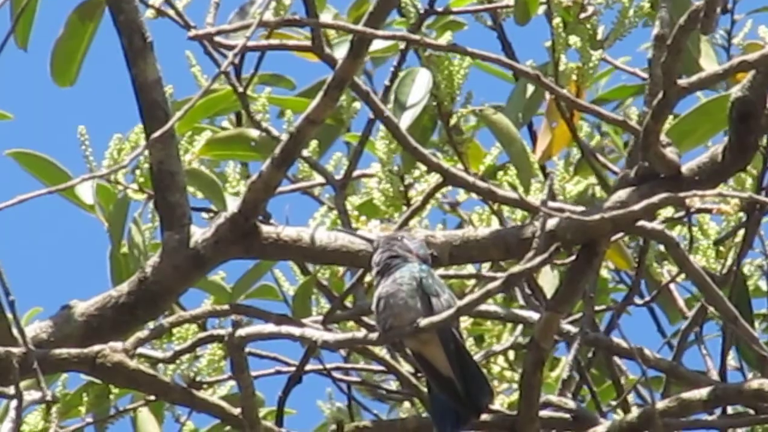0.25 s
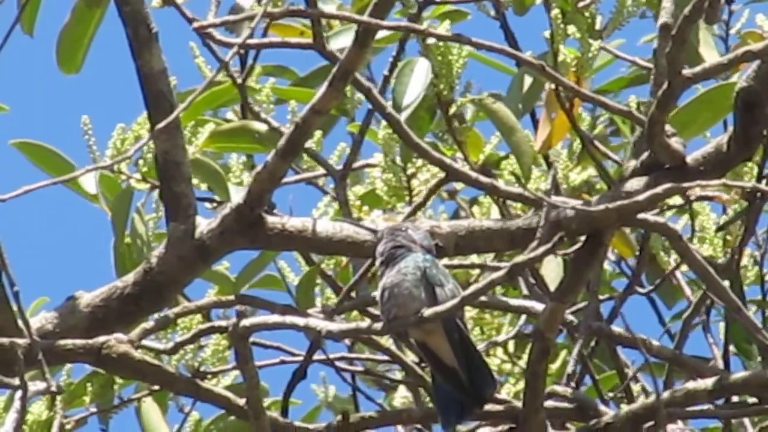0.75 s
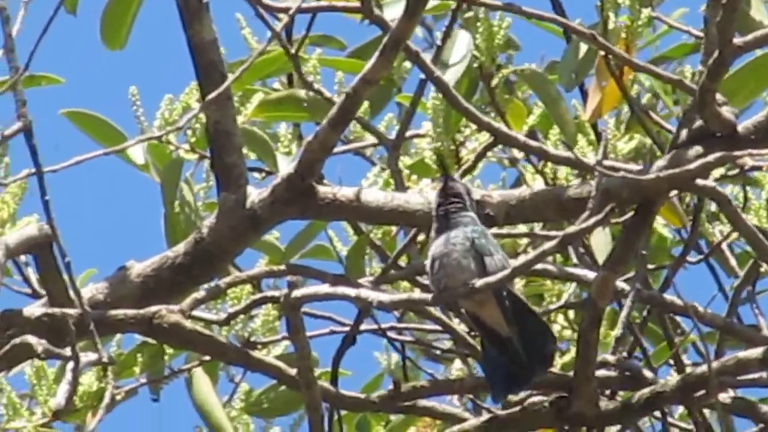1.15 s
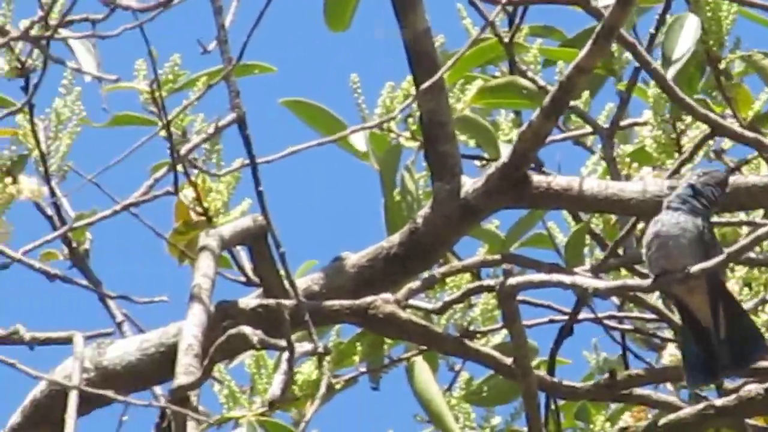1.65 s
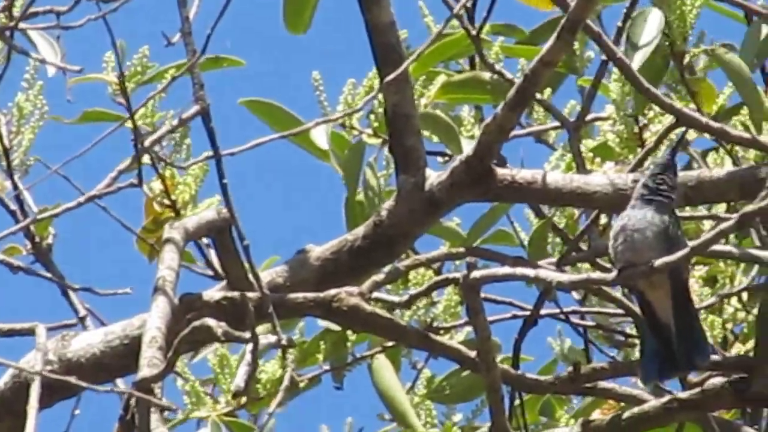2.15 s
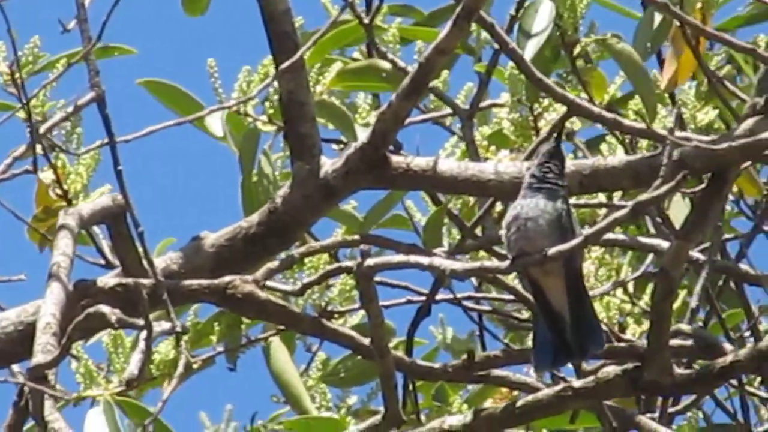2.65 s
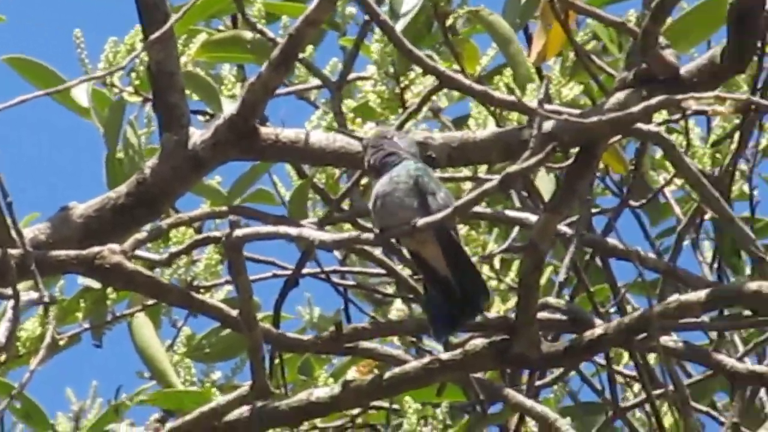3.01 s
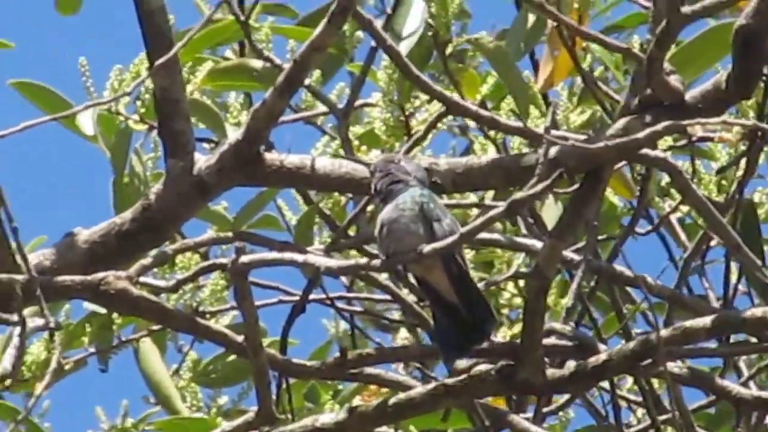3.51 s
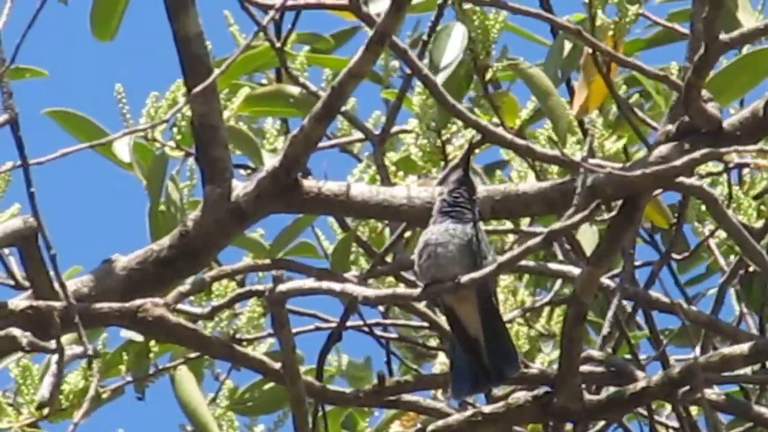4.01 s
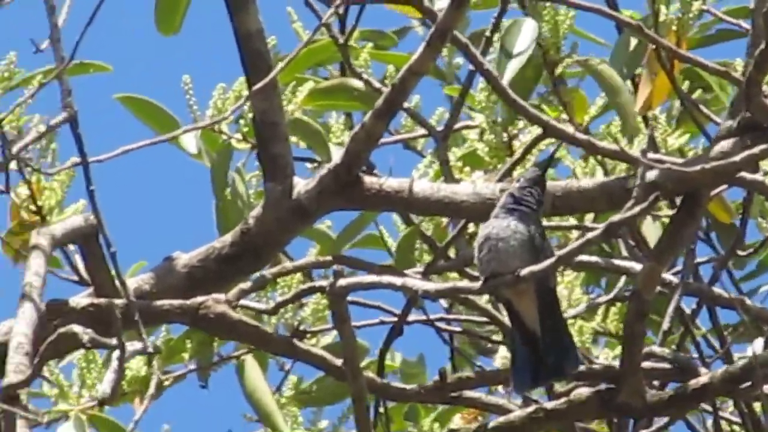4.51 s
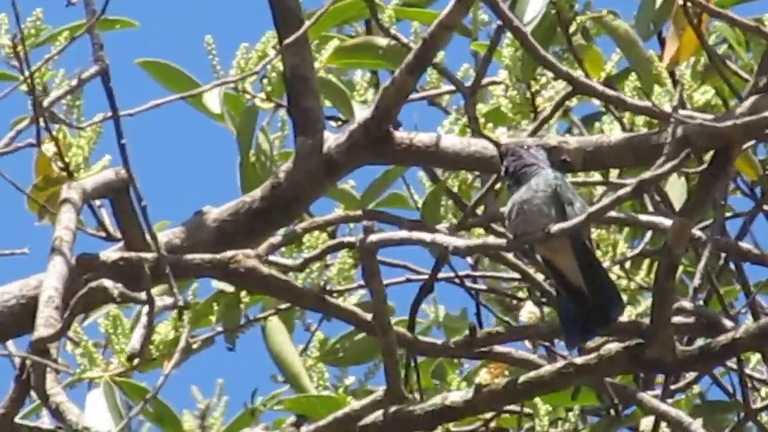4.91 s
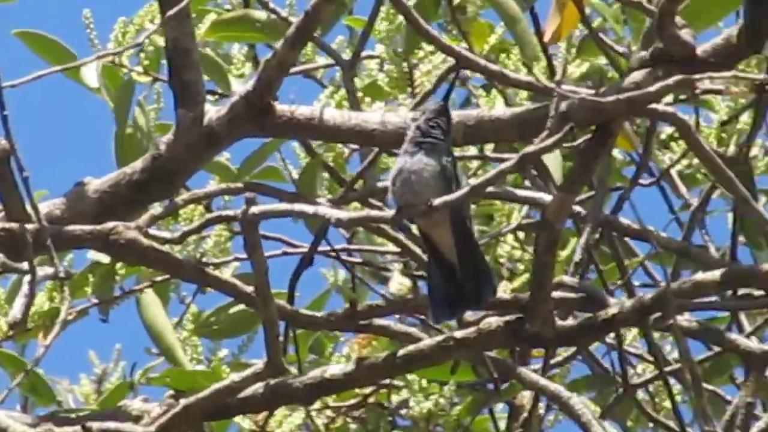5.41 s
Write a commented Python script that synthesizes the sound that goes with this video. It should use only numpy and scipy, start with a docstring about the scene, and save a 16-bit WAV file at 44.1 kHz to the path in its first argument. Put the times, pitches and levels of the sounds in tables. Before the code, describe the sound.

A soft, steady outdoor rush with a very faint low hum runs throughout, about five and a half seconds. At 1.2 seconds a hummingbird in a nearby tree begins a run of ten sharp, very high chips, evenly spaced a little under half a second apart, the last at about 5.1 seconds. Each is a tiny, almost pure whistle with a trace of hiss and a short tail from the leaves. They follow a repeating order: falling, rising, falling, wavering. The wavering ones, at 2.5 and 4.2 seconds, are higher and slightly softer. The chips are by far the loudest sound and sit just left of centre. From about 1.9 to 3.1 seconds a distant songbird gives a very faint thin whistle and six little upward notes. A few soft, dull knocks come around 3.5 to 3.7 seconds and again at 4.4.

```python
"""A hummingbird perched in a tree gives ten sharp chips in a repeating order: fall, rise, fall, wave.
Each is a near-pure, frequency-modulated whistle from the syrinx; falls and rises hop between two
registers. A faint band of hiss around 6 kHz is heard during each chip.
Reflection from limbs and scattering by leaves give each chip a short tail.
Behind it are a faint far songbird, a few soft knocks and a steady outdoor rush."""
import sys
import numpy as np
from scipy import signal
from scipy.fft import rfft, irfft
from scipy.io import wavfile
from scipy.ndimage import uniform_filter1d

SR = 44100
rng = np.random.default_rng(int(sys.argv[2]) if len(sys.argv) > 2 else 0)


def transcribe(u):
    """Save the signal u as a 16-bit wav file named by the first command-line argument.

    u: samples, shape (n,) or (channels, n), limited to [-1, 1]; the rate is SR.
    q: integer samples, one column per channel.
    """
    v = np.clip(np.atleast_2d(u).T, -1, 1)
    q = np.round(v * 32767).astype(np.int16)
    wavfile.write(sys.argv[1], SR, q)


N = 249592

# Settings of each gesture: (first register [0 lower, 1 upper], last register [0 or 1],
# flutter depth in the upper register [Hz], hiss gain [dB], overtone gain [dB])
GESTURES = {"fall": (1, 0, 150, -26.5, 0), "rise": (0, 1, 460, -29, -.7), "wave": (0, 0, 0, -50, 3)}
# The hummingbird's calls: (time [s], gesture [name], time stretch [ratio], pitch [ratio],
# glide depth [ratio], level [dB], register hop after onset [s], left minus right [dB])
CHIPS = [(1.2038, "fall", 1, .99, 1, -11.7, .0185, 1.7),
         (1.6414, "rise", 1.01, 1.002, 1, -11.4, .0303, 1.7),
         (2.0835, "fall", .99, 1.001, 1, -11.0, .0147, 1.5), (2.5112, "wave", 1, 1, 1, -13.4, 0, 1.4),
         (2.9527, "fall", 1.01, 1.008, 1.02, -11.2, .0157, 1.5),
         (3.3733, "rise", .99, .998, 1, -12.7, .028, 1.6),
         (3.8030, "fall", 1, 1.002, 1.02, -10.8, .0152, 2.0), (4.2290, "wave", 1, 1, 1.09, -16.5, 0, .8),
         (4.6915, "fall", .96, 1.004, .95, -11.8, .0118, 2.7),
         (5.1177, "rise", 1, .995, .98, -13.3, .0268, 1.4)]
# The bill beams treble forward, so low notes spill more into the leaves: (frequency [Hz], gain [dB])
LEAF_SPILL = [(3800, 9.5), (5000, 7.5), (6300, 4), (7500, 4), (12000, 6.5)]
# The far songbird's notes: (time [s], duration [s], starting pitch [Hz], upward slur [Hz], level [dB])
FAR_NOTES = [(1.926, 0.14, 3600, 110, -59), (2.292, .031, 4280, 240, -56), (2.407, .035, 4220, 300, -54),
             (2.54, .04, 4100, 180, -57.5), (2.666, .045, 4060, 200, -59.5), (2.80, 0.038, 3970, 190, -59),
             (3.092, .036, 3880, 200, -60)]
# Soft impacts: (time [s], level [dB], thud relative to body [dB], mode tuning [ratio])
KNOCKS = [(3.503, -48.5, -16, 1.03), (3.521, -55, -14, 1.05), (3.615, -55, 1, 0.4), (3.669, -49, 2, 0.81),
          (4.406, -50, -15, 1.3), (4.436, -56, -14, 0.91)]
# Resonances of the knocked body: (frequency before tuning [Hz], bandwidth [Hz], gain [dB])
KNOCK_MODES = [(730, 150, 4), (1050, 120, -17), (2860, 350, -16)]
# Spectral density of the outdoor rush: (frequency [Hz], relative level [dB])
RUSH_SPECTRUM = [(20, -18), (42, -14.5), (55, -8.5), (85, -1.5), (140, -3), (260, -5), (420, -2.5),
                 (560, -2.5), (810, 0), (1250, -3.5), (2000, -7.5), (4000, -13.5), (8000, -21),
                 (15500, -28)]
# Stereo width of the rush: (frequency [Hz], side minus mid [dB])
RUSH_WIDTH = [(50, -12), (130, -4.5), (300, -2), (700, -5), (1500, -3.5), (4000, 2), (12000, -2)]
# Low tones within the rush: (frequency [Hz], rms wander [Hz], level [dB])
HUM_TONES = [(55.7, 3.58, -70.5), (138, 3.48, -72)]

NOTE_HZ, CHIP_S = 6330, .052  # nominal resting note of falls and rises; time allotted to a chip
REGISTER_HOP_HZ, HOP_S = 700, .0003  # interval between registers; time constant of the hop
FLUTTER_RATE_HZ, PITCH_JITTER = 470, .005  # jitter is an rms fraction of the pitch


def hummingbird(right_lag_rad=0.39):
    """Multipath propagation: the bird turns its head, so each direct chip is joined by new echoes."""
    out = np.zeros((2, N))
    for start, gesture, stretch, ratio, depth, db, hop_at_s, pan_db in CHIPS:
        chip = syrinx(gesture, stretch, ratio, depth, hop_at_s)
        left = chip * undb(pan_db / 2)
        right = chip * undb(-pan_db / 2) * np.exp(-1j * right_lag_rad)
        tree = branches() + colour(foliage(), LEAF_SPILL)
        add(out, start, undb(db) * signal.fftconvolve(np.real([left, right]), tree, axes=1))
    return out


def syrinx(gesture, stretch, ratio, depth, hop_at_s, harmonics_db=(-27, -42), upper_db=-3):
    """Source and filter: one gliding whistle with weak harmonics, as a complex signal."""
    first, last, flutter_depth_hz, hiss_db, bright_db = GESTURES[gesture]
    t = np.arange(int(CHIP_S * SR)) / SR
    contour = {"fall": fall, "rise": rise, "wave": wave}[gesture]
    hz, envelope = contour(t / stretch, depth)
    register = first + (last - first) * (1 + np.tanh((t - hop_at_s) / HOP_S)) / 2
    # the upper register is unstable: its pitch flutters fast and unevenly
    flutter = np.sin(phase_of(FLUTTER_RATE_HZ * (1 + .5 * walk(FLUTTER_RATE_HZ, len(t)))))
    pitch = ratio * hz + register * (REGISTER_HOP_HZ + flutter_depth_hz * flutter)
    pitch *= 1 + PITCH_JITTER * walk(2500, len(t))
    phase = phase_of(pitch)
    # a faint band of hiss around 6 kHz is heard during each chip
    band = resonate(rng.standard_normal(len(t)), hz=6030, width_hz=2800)
    hiss = signal.hilbert(resonate(band, hz=6030, width_hz=2800))
    tone = envelope * (np.exp(1j * phase) + undb(hiss_db) * hiss / np.std(hiss))
    # the throat favours the fundamental, so overtones stand out more at the weak low end of a glide
    envelope_db = 20 * np.log10(np.maximum(envelope, 1e-9))
    overtone_db = bright_db + upper_db * register + envelope_db * (1 - 0.81 * (pitch < 6000))
    for k, harmonic_db in enumerate(harmonics_db, 2):
        tone += undb(overtone_db + harmonic_db) * np.exp(1j * k * phase) * (k * pitch < SR / 2)
    return tone * signal.windows.tukey(len(t), .04)


def fall(t, depth, swoop_hz=2600, swoop_s=.0068, drop_at_s=0.022, drop_hz=2560, drop_s=0.022):
    """Downward frequency sweep: the pitch swoops onto the note, rests, then drops as it fades."""
    swoop = swoop_hz * np.exp(-(t / swoop_s) ** 2)
    hz = NOTE_HZ + swoop - depth * drop_hz * ease(t - drop_at_s, drop_s)
    return hz, swell(t, attack_s=0.018, hold_s=0.00074, release_s=0.029)


def rise(t, depth, climb_hz=3620, climb_s=0.032, lift_at_s=0.037, lift_hz=280, lift_s=0.0068):
    """Upward frequency sweep: the pitch climbs ever more slowly to the note, then lifts a little."""
    to_go = 1 - np.sin(np.pi / 2 * np.minimum(t / climb_s, 1))
    hz = NOTE_HZ - depth * climb_hz * to_go + lift_hz * ease(t - lift_at_s, lift_s)
    return hz, swell(t, attack_s=.031, hold_s=.001, release_s=0.014)


def wave(t, depth, top_hz=9250, dip_at_s=0.0078, dip_hz=1050, dip_s=0.0055,
         drop_at_s=.018, drop_hz=2520, drop_s=.0072,
         flick_at_s=0.034, flick_hz=1050, flick_s=0.0102, lead_db=-10):
    """Frequency modulation in two pulses: a soft high dip, then a loud drop that ends in an upflick."""
    dip = dip_hz * np.exp(-((t - dip_at_s) / dip_s) ** 2)
    drop = drop_hz * (1 - 1 / (1 + (np.maximum(t - drop_at_s, 0) / drop_s) ** 2))
    hz = top_hz - depth * (dip + drop) + flick_hz * ease(t - flick_at_s, flick_s)
    lead = undb(lead_db) * swell(t, attack_s=.011, hold_s=.001, release_s=0.015)
    return hz, lead + swell(t - drop_at_s, attack_s=0.012, hold_s=0.0019, release_s=0.012)


def swell(t, attack_s, hold_s, release_s):
    """Amplitude envelope of one push of air."""
    return ease(t, attack_s) - ease(t - attack_s - hold_s, release_s)


def branches(count=12, echoes_db=-12.5):
    """Early reflections: distinct echoes from limbs around the perch follow the direct path."""
    paths = np.zeros(SR // 2)
    delays_s = rng.uniform(.002, .014, count)
    paths[(delays_s * SR).astype(int)] = rng.choice([-1, 1], count) * undb(echoes_db) / np.sqrt(count)
    paths[0] = 1
    return paths


def foliage(leaf_db=-17, leaf_t60=0.14, far_db=-26, far_t60=0.37, build_s=0.0048):
    """Diffuse scattering: leaves return a grainy tail, further trees a fainter and longer one."""
    t = np.arange(SR // 2) / SR
    build_up = 1 - np.exp(-t / build_s)
    leaves = rng.standard_normal((2, len(t))) ** 3 * build_up * np.exp(-np.log(1000) * t / leaf_t60)
    far_trees = rng.standard_normal((2, len(t))) * build_up * np.exp(-np.log(1000) * t / far_t60)
    return (level(leaves, leaf_db) + level(far_trees, far_db)) / np.sqrt(len(t))


def far_bird(scatter_gain_db=13):
    """Reverberation: scattering by leaves blurs a thin whistle and a run of little upslurs."""
    direct = np.zeros((1, N))
    for start, length_s, hz, slur_hz, db in FAR_NOTES:
        progress = np.linspace(0, 1, int(length_s * SR))
        pitch = hz + slur_hz * np.sin(2 * progress)
        add(direct, start, undb(db) * np.sin(np.pi * progress) * np.sin(phase_of(pitch)))
    return direct + undb(scatter_gain_db) * signal.fftconvolve(direct, foliage(), axes=1)[:, :N]


def knocks(attack_s=0.00087, decay_s=0.011, dull_hz=4000):
    """Damped resonance: each brief scuff excites a few broad modes over a low thud."""
    out = np.zeros((2, N))
    t = np.arange(SR // 6) / SR
    envelope = 2 * (1 - np.exp(-t / attack_s)) * np.exp(-t / decay_s)
    for start, db, thud_db, ratio in KNOCKS:
        scuff = rng.standard_normal(len(t)) + .5 * rng.standard_normal((2, len(t)))
        scuff = signal.lfilter(*signal.butter(2, dull_hz, fs=SR), scuff)
        body = sum(undb(mode_db) * resonate(scuff, hz * ratio, width_hz)
                   for hz, width_hz, mode_db in KNOCK_MODES)
        thud = resonate(scuff, hz=150, width_hz=130)
        add(out, start, envelope * (level(body, db) + level(thud, db + thud_db)))
    return out


def outdoors(rush_db=-51.5, flicker_db=-0.08, pan_db=-1.4, hum_pan_db=4):
    """Partial coherence between the ears spreads a distant rush wide around a faint wavering hum."""
    mid = colour(rng.standard_normal(N), RUSH_SPECTRUM)
    side = colour(colour(rng.standard_normal(N), RUSH_SPECTRUM), RUSH_WIDTH)
    left_right = np.array([[1], [-1]])
    rush = (mid + side * left_right) * undb(rush_db) / np.std(mid)
    hum = sum(level(np.sin(phase_of(hz + wander_hz * walk(16, N))), db)
              for hz, wander_hz, db in HUM_TONES)
    rush *= undb(flicker_db * walk(13, N) + left_right * pan_db / 2)
    return rush + hum * undb(left_right * hum_pan_db / 2)


def undb(db):
    """Amplitude ratio from decibels."""
    return 10 ** (np.asarray(db) / 20)


def level(x, db):
    """Normalisation to an rms level."""
    return x * undb(db) / np.sqrt(np.mean(x ** 2))


def add(out, start_s, x):
    """Superposition of a delayed sound on the mix."""
    i = int(start_s * SR)
    out[:, i:i + x.shape[-1]] += x[..., :N - i]


def phase_of(hz):
    """Phase as the time integral of frequency."""
    return 2 * np.pi * np.cumsum(hz) / SR


def colour(x, points):
    """Spectral shaping through points of (frequency [Hz], gain [dB])."""
    hz, db = np.transpose(points)
    count = x.shape[-1]
    bins_hz = np.maximum(np.fft.rfftfreq(count, 1 / SR), 1)
    return irfft(rfft(x) * undb(np.interp(np.log(bins_hz), np.log(hz), db)), count)


def resonate(x, hz, width_hz):
    """Second-order resonance with unit gain at its centre."""
    return signal.lfilter(*signal.iirpeak(hz, hz / width_hz, fs=SR), x)


def walk(rate_hz, count):
    """Low-pass noise: a smooth random wander of unit rms."""
    hold = max(int(SR / rate_hz), 1)
    steps = np.repeat(rng.standard_normal(count // hold + 1), hold)
    return level(uniform_filter1d(uniform_filter1d(steps, hold), hold)[:count], 0)


def ease(t, length_s):
    """Raised-cosine step from 0 to 1, starting at t = 0."""
    return np.sin(np.pi / 2 * np.clip(t / length_s, 0, 1)) ** 2


def scene():
    """Linear superposition of the near bird and its surroundings."""
    return hummingbird() + far_bird() + knocks() + outdoors()


def record(dry, cutoff_hz=15900):
    """Band limiting: a low-pass filter removes the top of the treble."""
    low_pass = signal.firwin(401, cutoff_hz, window=("kaiser", 8), fs=SR)
    return signal.fftconvolve(dry, low_pass[None], "same", axes=1)


dry = scene()
out = record(dry)
transcribe(out)
```